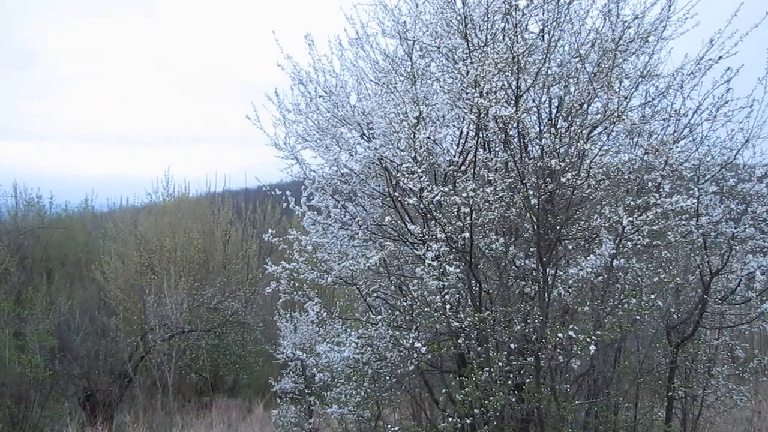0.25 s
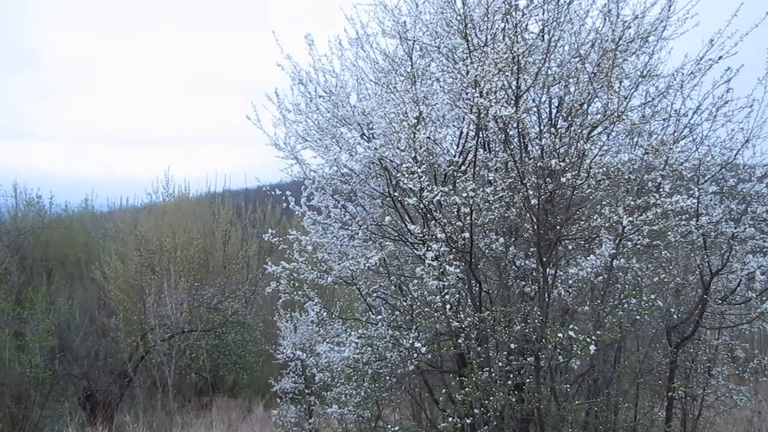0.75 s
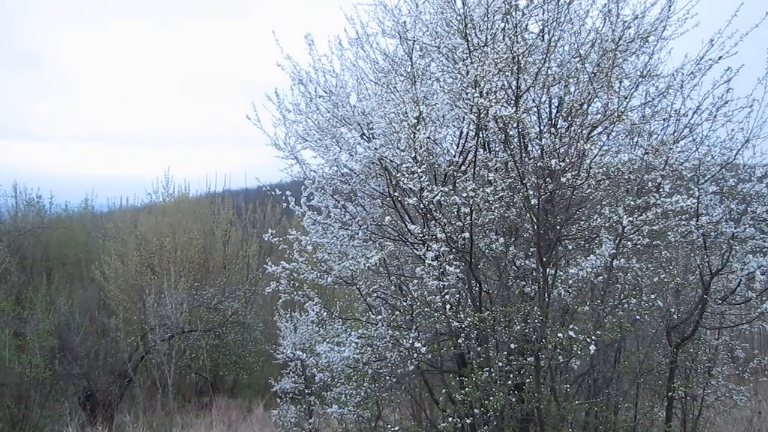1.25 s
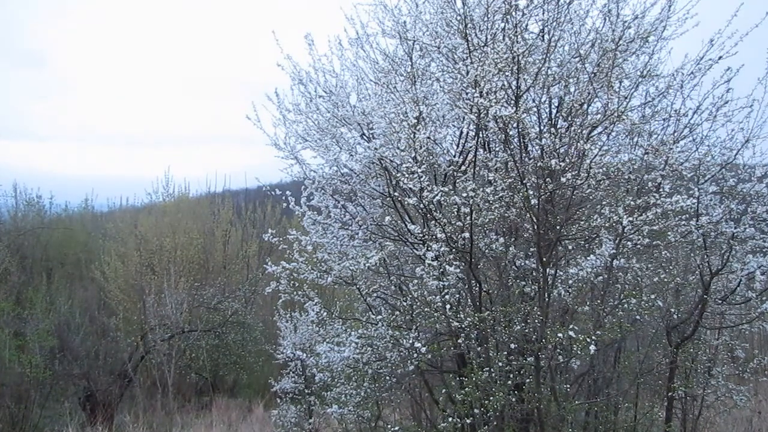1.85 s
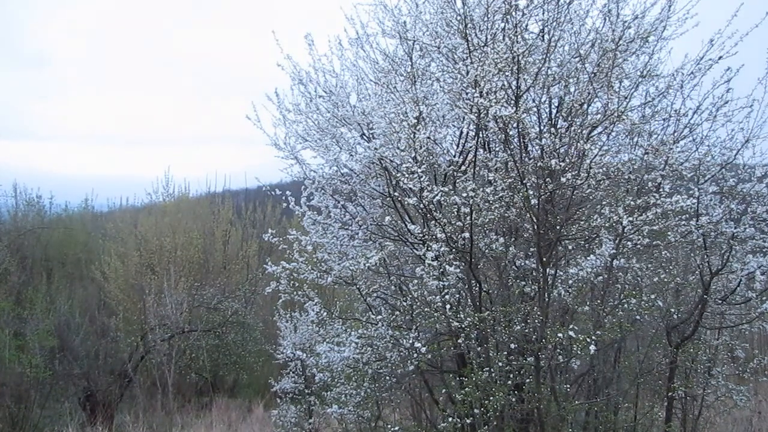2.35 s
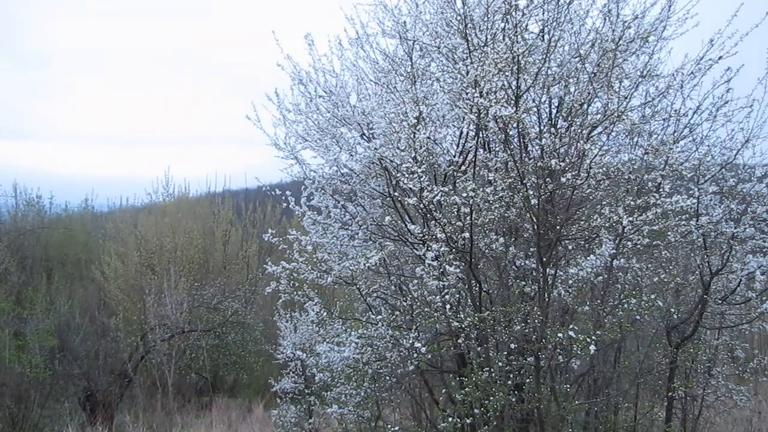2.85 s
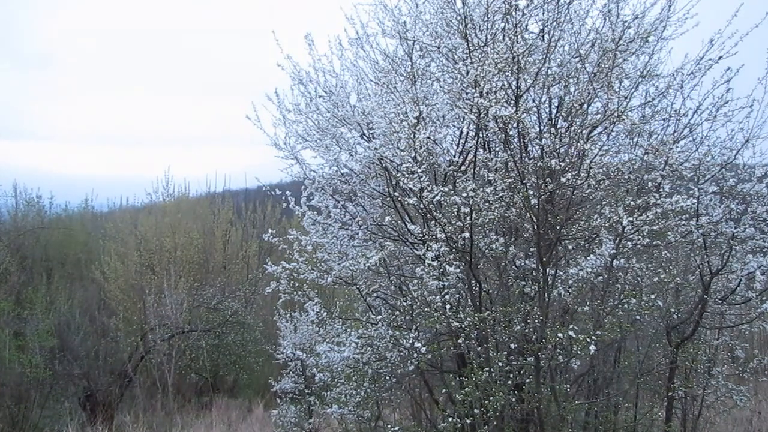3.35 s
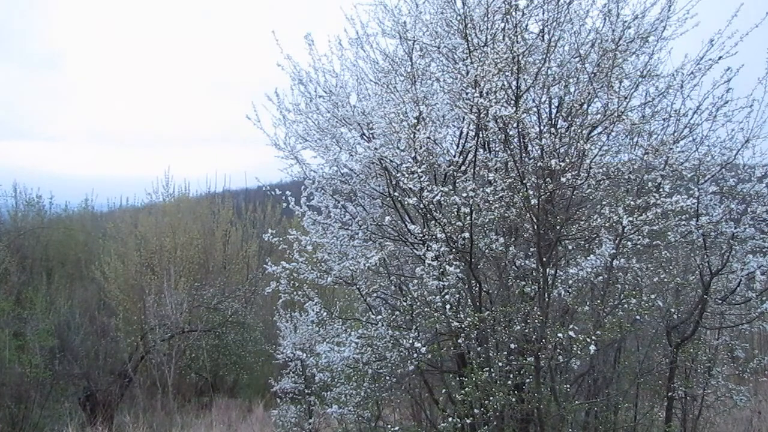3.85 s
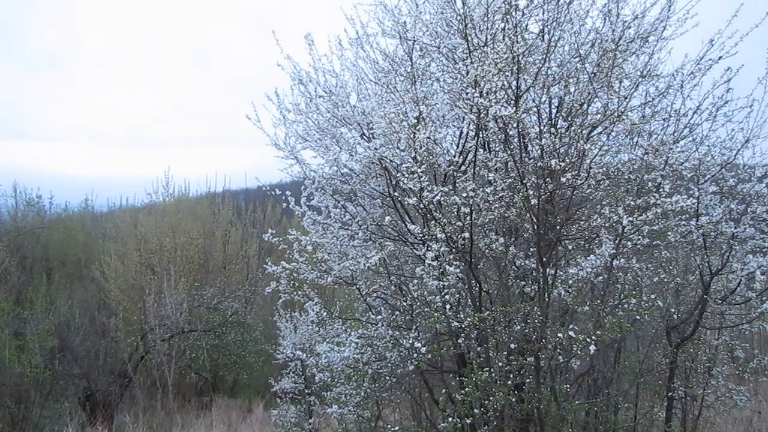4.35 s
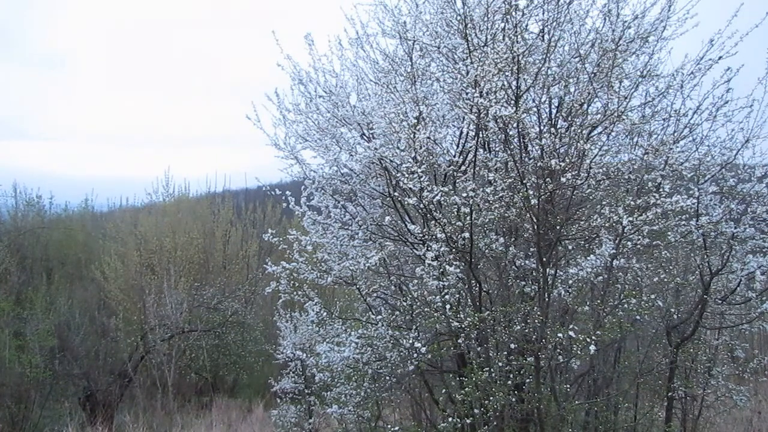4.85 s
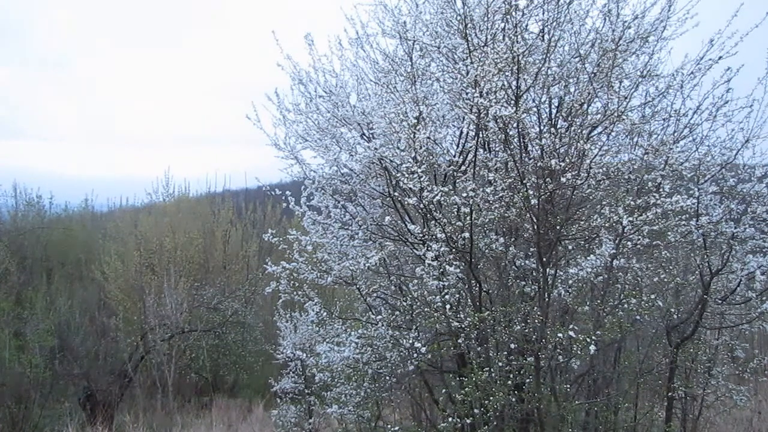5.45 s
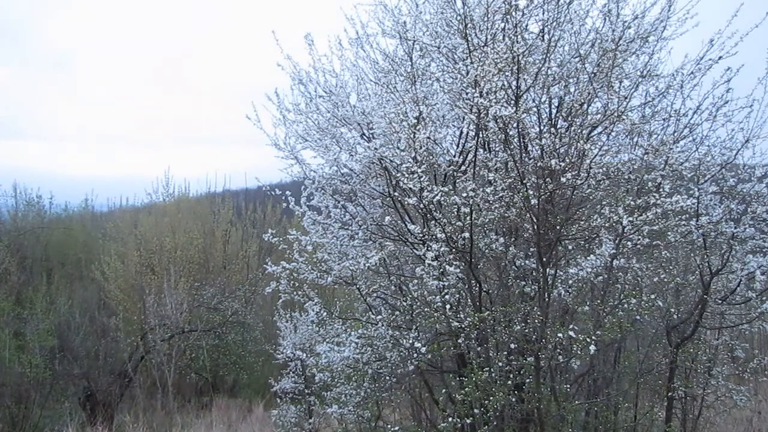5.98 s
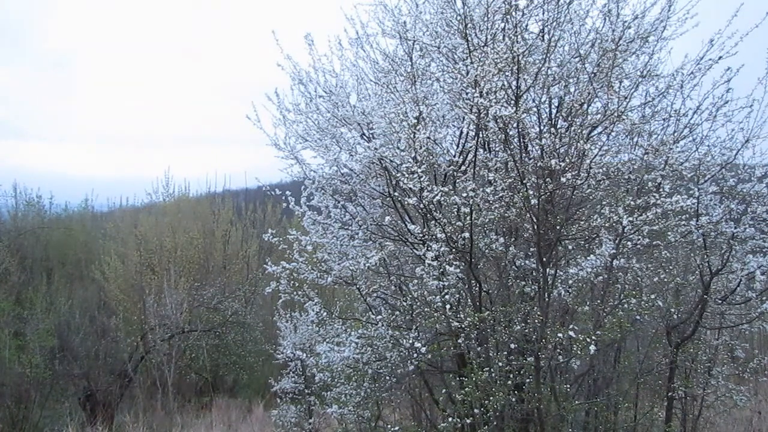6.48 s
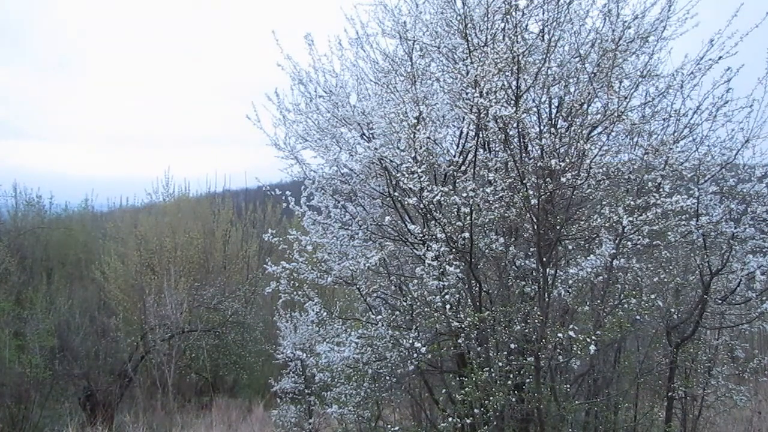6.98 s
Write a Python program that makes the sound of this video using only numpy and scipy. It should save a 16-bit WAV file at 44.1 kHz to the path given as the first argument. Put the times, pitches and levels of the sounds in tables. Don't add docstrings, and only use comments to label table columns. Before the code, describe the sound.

Several songbirds whistle, chip, trill and flute together among echoing trees, a nearby tit leading from the left, with soft low traffic drone beneath.

```python
import sys
import numpy as np
from scipy import signal
from scipy.fft import rfft, irfft
from scipy.io import wavfile
from scipy.ndimage import uniform_filter1d

SR = 44100
rng = np.random.default_rng(int(sys.argv[2]) if len(sys.argv) > 2 else 0)


def volts_from_decibels(level):
    exponent = np.asarray(level, float) / 20
    return 10 ** exponent


def wav_out(sig):
    wavfile.write(sys.argv[1], SR, np.round(np.clip(np.atleast_2d(sig).T, -1, 1) * 32767).astype(np.int16))


N = 318402

# (frequency [Hz], density [dB per Hz])
AIR = [(20, -9), (50, 0.5), (95, -1.5), (140, -4), (200, -10.5), (300, -13.5), (550, -13.5), (850, -16.5),
       (1100, -12.5), (1750, -21), (3100, -20), (3800, -16.5), (6300, -27.5), (15700, -40)]
# (frequency [Hz], correlation [-1..1])
SAME = [(60, 0.7), (130, 0.67), (300, 0.34), (700, 0.59), (1400, 0.042), (3500, 0.11), (15000, 0.068)]
# (frequency [Hz], left over right [dB])
LEAN = [(30, -2), (300, 0.5), (1200, 1.5), (8000, -0.5)]
# (time [s], pitch [Hz], level [dB])
ENGINE_LOW = [(0, 100, -60.5), (1.7, 101, -58.5), (2.4, 89, -59.5), (3.3, 98, -55), (4.4, 103, -59),
              (4.6, 103, -90), (7.22, 112, -55.5)]
ENGINE_HIGH = [(0, 140, -64), (2.0, 139.2, -62.5), (2.45, 134.3, -59.5), (4.3, 140, -61), (4.6, 127, -68.5),
               (7.22, 139.4, -59)]
ENGINE_DEEP = [(0, 84, -57), (1.2, 82, -70), (2.1, 52, -71), (4.3, 50, -71), (4.6, 55, -56),
               (7.22, 70.1, -69)]
# (pitch [Hz], level [dB])
WHINE = [(1147, -76), (1217, -75)]
# (frequency [Hz], time to fall 60 dB [s])
TREES = [(1500, 2), (3400, 1.57), (4400, 0.75), (8000, 1.17)]
# (time [s], level [dB])
FAR_SWELL = [
    (2.4, -12),
    (3.4, -3),
    (5.3, 1.5),
    (7.22, -4.5),
]
FAR_HELD_HZ = [3430, 3850, 4340]

FLAT_S, LOW_S, DROOP_S = 0.066, 0.084, 0.103
FAR_RISE = [(2.325, 0.19, -51.5), (2.868, 0.19, -51), (3.397, 0.21, -51.5), (3.92, 0.17, -50),
            (4.469, 0.18, -49.5)]
SECOND_LOW = [(s, LOW_S, db) for s, db in [(-.09, -46), (0.918, -44), (1.315, -43.5), (3.709, -50),
              (4.111, -44), (4.418, -42.5), (4.717, -44), (5.036, -42.5), (5.369, -42.5)]]
SECOND_HIGH = [(0.021, 0.071, -52), (1.447, 0.05, -51), (4.237, 0.067, -51), (4.537, 0.05, -46.5),
               (4.835, 0.062, -47), (5.152, 0.073, -47), (5.487, 0.065, -50.5)]
SECOND_LONG = [(1.073, 0.13, -49.5), (3.86, 0.148, -50)]
CHIP_TAILS = [(0.548, 0.016, -47), (0.744, 0.018, -41), (0.844, 0.021, -41.5), (0.943, 0.015, -41)]
CHIP_CORES = [(.44, 0.008, -52), (.534, 0.017, -44), (.73, .018, -41), (.828, .018, -41.5),
              (.927, 0.014, -42), (1.358, 0.023, -57)]
BUZZES = [(1.89, 0.064, -57), (2.177, 0.11, -55), (2.545, 0.075, -57.5), (2.855, 0.091, -58)]
DROOPS = [(s, DROOP_S, db) for s, db in [(1.556, -59), (1.762, -65), (3.53, -57.5), (3.745, -59),
          (5.612, -56.5), (5.818, -55), (6.768, -59.5), (6.988, -57)]]
KNOCKS = [(3.93, 0.048, -62), (5.065, 0.037, -57.5)]
NEAR_RISE = [(-0.115, 0.14, -36.5), (0.384, 0.16, -37), (0.898, 0.14, -36), (1.459, 0.15, -37),
             (1.991, 0.16, -36)]
NEAR_RISE_TURNED = [(5.03, 0.17, -43), (5.568, 0.17, -38.5), (6.096, 0.165, -40.5), (6.632, 0.17, -39)]
NEAR_FLAT_TURNED = [(s, FLAT_S, db) for s, db in [(5.275, -42), (5.817, -35.5), (6.348, -40.5),
                    (6.893, -41)]]
# (time [s], level [dB])
MOTIFS = [(4.309, -50.5), (4.457, -49.5), (4.598, -49.5), (4.753, -51)]
ARCHES = [(s, 0.017, db) for s, db in MOTIFS]
HOOKS = [(s + 0.017, 0.015, db + 0.5) for s, db in MOTIFS]
DROPS = [(s + 0.03, 0.033, db - 5) for s, db in MOTIFS]

# (start [s], length [s], level [dB], first pitch [Hz], last pitch [Hz])
THIN = [(0.001, .09, -58, 3430, 3420), (.03, .11, -62, 3870, 3850), (2.51, .11, -57, 3860, 3880),
        (2.62, .09, -64, 3500, 3450), (6.27, .03, -53, 3830, 3800), (6.195, .014, -61, 5100, 5300),
        (6.455, .1, -66, 5800, 5800), (6.82, .08, -62, 3800, 3850), (3.059, 0.062, -58, 3280, 3500),
        (2.715, 0.13, -62, 4040, 3950), (2.935, .06, -62, 3290, 3350), (3.03, .025, -64, 5200, 5800),
        (3.08, .11, -59, 3880, 3870), (3.141, 0.048, -57.5, 4400, 4450), (3.217, .022, -56, 4430, 4480),
        (3.28, .06, -64, 4460, 4400), (3.34, 0.031, -62, 4350, 4050), (3.53, 0.058, -56, 3410, 3400),
        (3.44, 0.055, -58, 3280, 3400), (.33, .035, -58, 4000, 4280), (.59, 0.048, -60, 3880, 4030),
        (1.841, 0.14, -56, 3800, 4100), (3.683, 0.1, -58, 4370, 4540), (3.808, .05, -56.5, 4460, 4430),
        (4.09, 0.04, -68, 5400, 5700), (4.105, 0.11, -57, 3900, 3800), (4.565, .035, -55, 4640, 4330),
        (5.97, .15, -68, 5800, 5780), (6.1, 0.18, -63.5, 4470, 4420), (6.359, 0.15, -68.5, 5820, 5800),
        (6.419, .08, -64, 4330, 4330), (3.982, 0.16, -58, 3340, 3420), (4.196, 0.11, -52.5, 4390, 4600),
        (4.425, 0.027, -58, 4400, 4400), (4.705, 0.06, -56, 4600, 4380), (4.765, 0.115, -52, 4330, 4400),
        (6.741, 0.24, -65.5, 5980, 5750), (6.95, 0.13, -56.5, 4620, 4690), (6.97, 0.11, -60, 4330, 4300),
        (6.915, .05, -68, 6300, 5800)]
UPPER_VOICE = [(1.09, 0.095, -58, 5020, 5120), (3.872, 0.1, -56.5, 5060, 5100),
               (4.255, 0.047, -54, 4950, 5100), (4.572, .03, -54, 5040, 5080), (5.17, .05, -58, 4960, 5050),
               (5.505, .055, -53, 4900, 5100)]
CHUCKS = [(0.886, 0.029, -52.5, 1480, 1400), (.893, .016, -62, 1800, 1750),
          (2.12, 0.026, -52.5, 1340, 1320), (3.545, .025, -60, 1200, 1150), (3.94, .028, -63.5, 1340, 1320),
          (5.571, 0.032, -48.5, 1290, 1260)]
FLUTES = [(2.98, .025, -65, 3000, 2750), (3.3, 0.023, -56.5, 2960, 2380), (3.468, 0.014, -55.5, 2800, 2450),
          (3.505, 0.011, -62, 2700, 2400), (3.754, 0.01, -59, 2800, 2640), (3.765, 0.0132, -53, 2605, 3270),
          (5.1, 0.1, -57, 3320, 2520), (5.417, 0.0392, -58.5, 1615, 2195), (5.438, 0.085, -52, 3480, 3370),
          (5.52, .088, -52.5, 3370, 2880), (5.892, 0.022, -57.5, 3200, 3300),
          (5.962, 0.058, -58, 2400, 2900), (5.938, .014, -58, 2950, 3150), (4.715, .02, -58, 3000, 3300),
          (5.335, 0.11, -60, 2920, 2240), (6.225, .018, -60, 3700, 3060), (5.95, 0.032, -56, 3350, 3630),
          (5.982, .014, -57, 3630, 3480), (5.998, .018, -61, 3650, 4200), (6.5, 0.073, -65, 2800, 2980),
          (6.255, 0.036, -51.5, 2720, 3010), (6.365, 0.055, -53.5, 2450, 2700),
          (6.42, 0.063, -59, 2700, 2800), (3.875, 0.0155, -55, 3800, 2520),
          (7.192, 0.021, -59.5, 2230, 2750)]
HAZY_FLUTES = [(.05, .11, -66, 2306, 2240), (0.21, 0.2, -70, 2250, 2237), (.5, 0.2, -70, 2262, 2220),
               (1.261, 0.1, -58, 2170, 2070), (1.295, 0.097, -57.5, 2550, 2196),
               (1.368, 0.18, -59.5, 2290, 2080), (1.62, 0.071, -56, 2188, 1774),
               (1.677, 0.08, -58.5, 2155, 2170), (1.8, 0.035, -57, 2220, 2500),
               (1.83, 0.045, -56, 2477, 2440), (1.92, 0.25, -67.5, 2453, 2460),
               (1.52, .1, -62.5, 1900, 2105), (1.889, 0.069, -58.5, 2146, 2065),
               (2.101, 0.097, -58.5, 2110, 2033), (2.33, 0.13, -67, 2040, 1970),
               (3.18, 0.12, -68, 1950, 1825), (3.44, 0.025, -63, 2090, 1980),
               (3.63, 0.023, -64, 1930, 2110), (3.7, 0.027, -57, 2800, 2940),
               (5.185, 0.13, -64, 2240, 2110), (4.9, 0.11, -65, 2000, 1800), (7.105, .11, -62, 2700, 2950),
               (2.915, .05, -66, 1940, 1840), (4.11, 0.077, -74, 2550, 2550),
               (5.945, 0.05, -62, 2230, 2300), (6.045, .02, -63, 2250, 2280),
               (6.125, 0.04, -62, 2250, 2065), (6.68, 0.074, -64, 2063, 2120)]
CHIPS = [(0.432, 0.008, -56, 6300, 5000), (0.53, 0.006, -49, 6300, 4970), (0.632, 0.0069, -45, 6580, 4360),
         (.545, .008, -51, 7800, 4300), (.641, .01, -51, 4500, 3270), (.703, .012, -61, 5000, 6540),
         (0.722, 0.009, -45, 6100, 4900), (.897, .013, -59, 5200, 6500), (0.8, 0.013, -55, 5010, 6640),
         (0.821, 0.008, -47, 6100, 4900), (0.919, 0.008, -48, 6100, 4900), (1.045, 0.016, -61, 7800, 6940),
         (1.008, 0.024, -46, 6600, 4500), (1.024, 0.0063, -46, 4560, 5960),
         (1.031, 0.0089, -42, 5600, 3750), (1.171, 0.012, -46.5, 6450, 5100),
         (1.18, 0.013, -56, 7750, 6740), (1.19, 0.0097, -44, 6200, 4400), (1.309, 0.035, -64, 7900, 5770),
         (1.339, 0.019, -49, 6430, 4830), (1.503, 0.016, -50, 6840, 5230), (1.524, 0.022, -53, 6000, 3900),
         (1.677, 0.017, -51, 6480, 5050), (1.695, 0.012, -53, 6000, 4500), (5.922, .014, -52, 4500, 2200),
         (6.074, 0.024, -52, 5100, 4050), (6.094, .018, -51, 4150, 3620), (6.11, .028, -45.5, 3680, 2950),
         (5.19, .018, -61, 7700, 6900)]
SLIDES = [(1.937, 0.034, -50.5, 4190, 4960), (1.968, 0.052, -51.5, 6080, 4040),
          (2.291, 0.071, -46, 6130, 4250), (2.618, 0.055, -47, 6200, 4700), (2.672, 0.058, -55, 4550, 2750),
          (2.952, 0.065, -50, 6120, 4200), (3.02, .035, -53, 3950, 2900)]
SHORT_DROOPS = [(2.49, 0.056, -62, 6200, 6250), (2.812, 0.067, -61, 6100, 5600),
                (3.13, 0.028, -60.5, 7750, 7630), (3.256, 0.033, -60, 7700, 7600),
                (7.062, .055, -57, 6000, 5880)]
PURRS = [(.6, 0.062, -53, 4550, 4700), (2.33, 0.1, -63.5, 2900, 2980), (1.069, 0.042, -45.5, 3890, 3900),
         (1.232, 0.043, -51.5, 3950, 4070), (1.4, 0.048, -52.5, 4000, 4030), (2.213, 0.12, -60, 2950, 3110),
         (5.055, 0.035, -56, 2250, 2350), (5.11, .06, -57.5, 2100, 2250), (5.09, 0.04, -53, 4650, 4550),
         (5.451, 0.079, -56.5, 1910, 2040)]
TRILLS = [(4.974, 0.057, -52, 4390, 3580), (5.286, 0.0069, -45, 4700, 5900),
          (5.396, 0.028, -50, 4450, 3750), (6.029, 0.027, -55, 5340, 5720)]
NEAR_FLAT = [(s, FLAT_S, *rest) for s, *rest in [(0.115, -37.5, 4345, 4265), (0.638, -36.5, 4280, 4285),
             (1.141, -38, 4320, 4290), (1.711, -38.5, 4305, 4270), (2.254, -38.5, 4260, 4305)]]


def evened(x):
    return x / np.sqrt(np.mean(x ** 2) + 1e-20)


def read(points, hz):
    f, value = np.transpose(points)
    return np.interp(np.log(hz + 1), np.log(f + 1), value)


def add(mix, s, sound):
    at = round(s * SR)
    part = mix[max(at, 0):][:len(sound) + min(at, 0)]
    part += sound[max(-at, 0):][:len(part)]


def drift(rate_hz):
    low_pass = signal.butter(2, rate_hz, fs=SR, output="sos")
    return evened(signal.sosfilt(low_pass, rng.standard_normal(N)))


def air():
    frames, hz = N // 512 + 5, np.fft.rfftfreq(2048, 1 / SR)
    a, b, c, d, patches = rng.standard_normal((frames, 1025, 5)).T
    patches = evened(uniform_filter1d(uniform_filter1d(patches, 20, 0), 12, 1))
    same = np.clip(read(SAME, hz), -1, 1)[:, None]
    left = a + 1j * b
    right = same * left + np.sqrt(1 - same ** 2) * (c + 1j * d)
    z = np.array([left, right]) * volts_from_decibels(read(AIR, hz)[:, None] + 0.91 * patches)
    z = z * volts_from_decibels(np.multiply.outer([0.5, -0.5], read(LEAN, hz)))[..., None]
    return volts_from_decibels(-50.5) * evened(signal.istft(z, nperseg=2048, noverlap=1536)[1][:, :N])


def traffic():
    t, out = np.arange(N) / SR, np.zeros(N)
    for rows in (ENGINE_LOW, ENGINE_HIGH, ENGINE_DEEP):
        s, pitch, db = np.transpose(rows)
        level = volts_from_decibels(np.interp(t, s, db) + 1.4 * drift(0.93))
        hz = np.interp(t, s, pitch) + 0.86 * drift(2.78)
        out += np.sqrt(2) * level * np.sin(2 * np.pi * np.cumsum(hz) / SR)
    for pitch, db in WHINE:
        level = volts_from_decibels(db + 4.5 * drift(2.0))
        hz = pitch + 1.437 * drift(1.82)
        out += np.sqrt(2) * level * np.sin(2 * np.pi * np.cumsum(hz) / SR)
    return out * volts_from_decibels([[-0.6], [0.6]])


def trees(x):
    taps = np.zeros((2, SR))
    at = np.arange(120, SR - 40, 40) + rng.integers(0, 40, (2, (SR - 121) // 40))
    strength = rng.choice([-1., 1.], at.shape) * rng.exponential(1, at.shape)
    np.put_along_axis(taps, at, strength, 1)
    hz, t, z = signal.stft(taps, SR, nperseg=256)
    branches = volts_from_decibels(6 - 60 * t / 0.25)
    trunks = volts_from_decibels(-60 * t / read(TREES, hz)[:, None])
    tail = signal.istft(z * (branches + trunks), SR, nperseg=256)[1]
    return signal.fftconvolve(x[None], tail / np.linalg.norm(tail[0]), axes=1)[:, :N]


LEAD_S = 0.007


def whistle(length, start_hz, mid_hz, end_hz, db, swell_db=0, arch_db=0, flick_hz=0, flick_s=0.003,
            droop_hz=0, shake_hz=0, shakes_per_s=0, calm=0.92, skew=1, top_db=0):
    t = np.arange(-LEAD_S, length + LEAD_S, 1 / SR)
    u = np.clip(t / length, 0, 1)
    hz = start_hz * (1 - u) * (1 - 2 * u) + mid_hz * 4 * u * (1 - u) + end_hz * u * (2 * u - 1)
    hz = hz + flick_hz * np.exp(-(t + LEAD_S) / flick_s) - droop_hz * np.exp((t - length) / 0.00906)
    swing = np.cos(2 * np.pi * (shakes_per_s * t % 1) ** skew)
    hz = hz + shake_hz * (1 - calm * u ** 2) * swing
    db = db + top_db * u * (1 + swing) / 2
    db = db + swell_db * (u - 0.5) - arch_db * (2 * u - 1) ** 2
    edge = min(0.012, length / 3)
    faintest = 0.29 * min(flick_hz / 1000, 1)
    opening = np.clip((t + edge / 4) / (edge / 2), faintest, 1)
    closing = np.clip((length + edge / 2 - t) / edge, 0, 1)
    return np.sqrt(2) * volts_from_decibels(db) * opening * closing * np.exp(2j * np.pi * np.cumsum(hz) / SR)


def path(shape, first_hz=None, last_hz=None):
    if first_hz is None:
        return shape
    return first_hz, first_hz + shape[0] * (last_hz - first_hz) + shape[1], last_hz


def singer(syllables, pan_db, lead_rad, swell_db, waver_db, echo_db, **manner):
    song = np.zeros(N, complex)
    for shape, notes in syllables:
        for s, length, db, *ends in notes:
            add(song, s - LEAD_S, whistle(length, *path(shape, *ends), db, swell_db, **manner))
    sides = evened(volts_from_decibels(np.array([pan_db, -pan_db]) / 2))
    ears = sides * np.exp(0.5j * np.array([lead_rad, -lead_rad]))
    waver = volts_from_decibels(waver_db * np.minimum([drift(51), drift(42)], 0.8))
    rustle = volts_from_decibels(echo_db + 3 * drift(62))
    return (ears[:, None] * song).real * waver, rustle * song.real * waver[1]


def together(*voices):
    direct, sent = zip(*voices)
    return sum(direct), sum(sent)


def far_chorus():
    notes_per_s, low_hz, high_hz = 75, 2255, 4820
    draws = rng.random((round(notes_per_s * N / SR), 6))
    song = np.zeros(N, complex)
    for when, pitch, glide, length, size, kind in draws:
        hz = low_hz * (high_hz / low_hz) ** pitch
        bend = 0.3 * hz * (glide - 0.65)
        if kind < 0.3:
            hz, bend = FAR_HELD_HZ[int(pitch * len(FAR_HELD_HZ))], bend / 10
            size = size / 2
        note = whistle(0.01918 + 0.08 * length, hz - bend, hz, hz + bend, -71.5 + 11 * size)
        add(song, when * N / SR, note)
    return song.real * volts_from_decibels(np.interp(np.arange(N) / SR, *np.transpose(FAR_SWELL)))


def far_tit():
    return singer([((3590, 3810, 3890), FAR_RISE)], -0.25, -3.5, -1.5, 2.2, -2)


def low_callers():
    return singer([((0.5, 240), CHUCKS), ((678, 735, 660), KNOCKS)], 0.3, 0.49, 0.3, 1.5, -12,
                  shake_hz=40, shakes_per_s=140, calm=0.3)


def thin_callers():
    return singer([((0.6, 28.2), THIN + UPPER_VOICE)], 2.1, 2.13, 0.3, 5, -5.5)


def thrush():
    flutes = singer([((0.55, 6.2), FLUTES), ((2750, 2990, 2500), DROPS)], -10, -0.43, -0.46, 5.7, -6)
    hazy = singer([((0.45, 50.4), HAZY_FLUTES)], -2.5, -0.9, -1.5, 5, -1, shake_hz=40, shakes_per_s=45)
    return together(flutes, hazy)


def warbler():
    trill_runs = [(4.884, 0.09, -54), (5.295, 0.089, -41)]  # (start [s], length [s], level [dB])
    chips = singer([((0.69, 5.5), CHIPS), ((4350, 4180, 3990), CHIP_TAILS)], -6.5, -2.3, 6, 1.8, -10)
    cores = singer([((5050, 4620, 3450), CHIP_CORES)], -6, -2.14, -11, 1.5, -12.5)
    buzzes = singer([((6740, 6690, 5950), BUZZES)], -4.5, -2.8, 2.5, 1.6, -8.5,
                    shake_hz=416, shakes_per_s=100)
    slides = singer([((0.54, 28), SLIDES)], -4.5, -2.4, -6, 4.5, -5, arch_db=10)
    droops = singer([((7020, 6260, 5720), DROOPS), ((0.55, 6.2), SHORT_DROOPS)], -5.5, -2.55, 13, 3.5, -10.5,
                    droop_hz=855)
    purrs = singer([((0.49, 57.6), PURRS)], -6.5, -1.5, 0.3, 2.5, -0.5, shake_hz=265, shakes_per_s=90)
    runs = singer([((5800, 5460, 4830), trill_runs)], -5.5, -1.8, 2.5, 2.5, -7,
                  shake_hz=210, shakes_per_s=52, calm=-1.7, skew=1.45, top_db=-13)
    turns = singer([((0.55, -330), TRILLS), ((3750, 4560, 3650), ARCHES), ((3700, 3750, 2550), HOOKS)],
                   -5.5, -1.8, 0.3, 2, -9)
    return together(chips, cores, buzzes, slides, droops, purrs, runs, turns)


def second_tit():
    low = singer([((3385, 3425, 3415), SECOND_LOW)], -2.5, 1.3, -4.5, 2, -8, flick_hz=480, flick_s=0.013)
    high = singer([((4800, 4805, 4870), SECOND_HIGH), ((4800, 4885, 4885), SECOND_LONG)],
                  5.4, 1.5, -3.2, 3, -7.5, shake_hz=45, shakes_per_s=150, calm=-0.7)
    return together(low, high)


def near_tit():
    rise_hz = (3663, 3790, 3885)
    rise = singer([(rise_hz, NEAR_RISE)], 22, -0.93, -3, 2.5, -8.5, arch_db=11)
    flat = singer([((0.5, 30), NEAR_FLAT)], 8.5, 1.06, 3.5, 1.6, -13,
                  flick_hz=1500, flick_s=0.0023, arch_db=-3.5)
    rise_turned = singer([(rise_hz, NEAR_RISE_TURNED)], 9.2, 2.2, 0.69, 3, -9.5, arch_db=4, droop_hz=-130)
    flat_turned = singer([((4350, 4350, 4310), NEAR_FLAT_TURNED)], 3.1, 2.19, -0.44, 2, -9,
                         flick_hz=2600, flick_s=0.002)
    return together(rise, flat, rise_turned, flat_turned)


def scene():
    direct, sent = together(far_tit(), low_callers(), thin_callers(), thrush(), warbler(), second_tit(), near_tit())
    return air() + traffic() + trees(far_chorus() + sent) + direct


def top_cut(x):
    return signal.sosfilt(signal.butter(12, 15760, fs=SR, output="sos"), x)


def record(dry):
    hz = np.fft.rfftfreq(N, 1 / SR)
    band = (hz < 15725) / np.sqrt(1 + (29 / (hz + 1)) ** 6)
    mix = irfft(rfft(dry) * band, N)
    return top_cut(mix)


dry = scene()
out = record(dry)
wav_out(out)
```